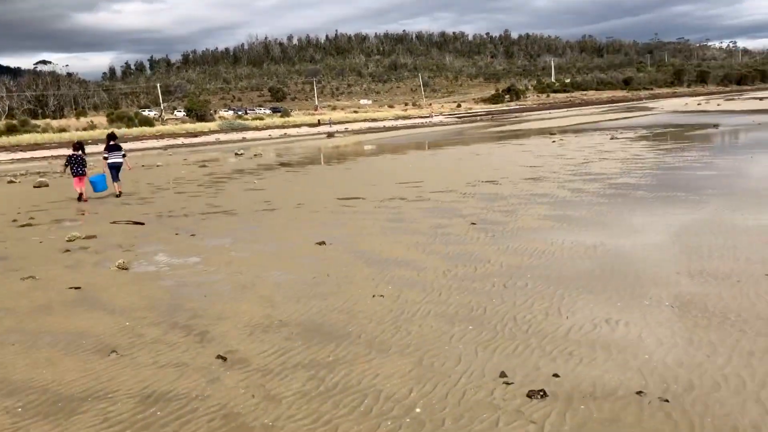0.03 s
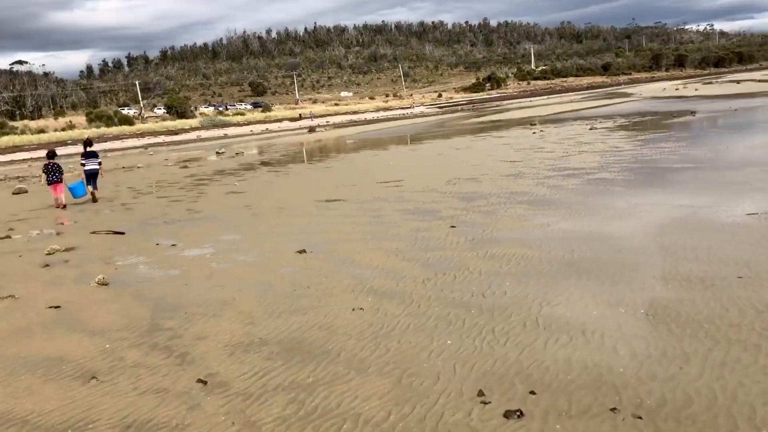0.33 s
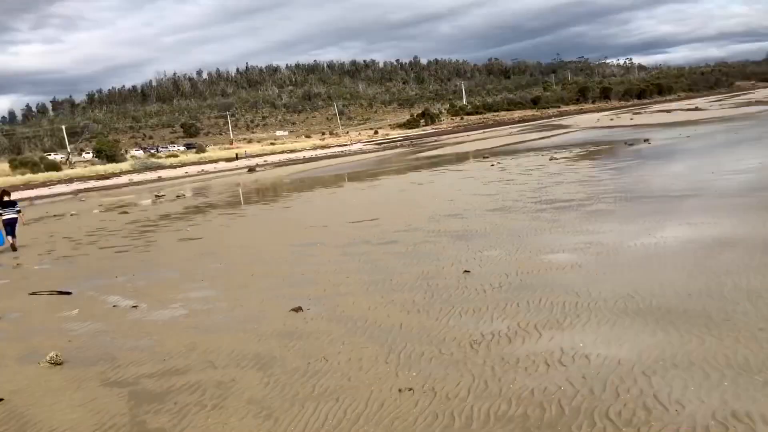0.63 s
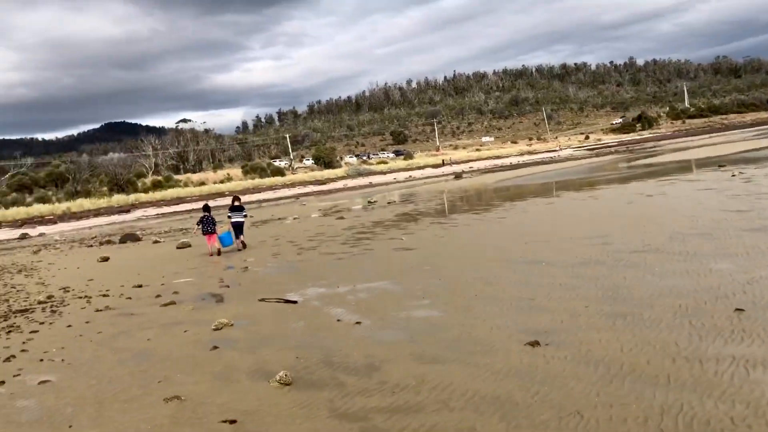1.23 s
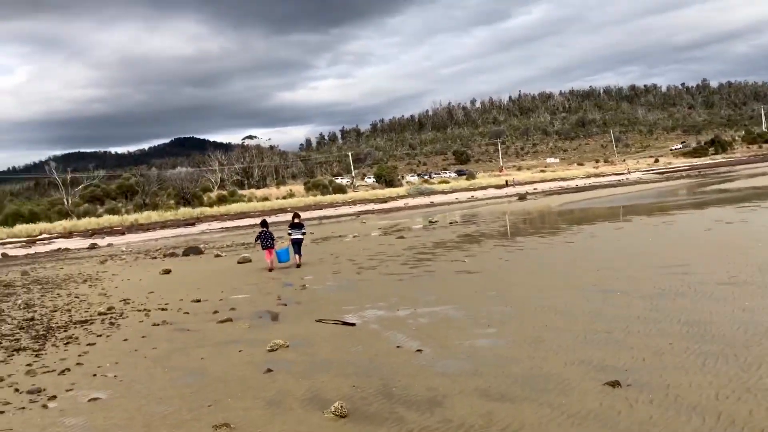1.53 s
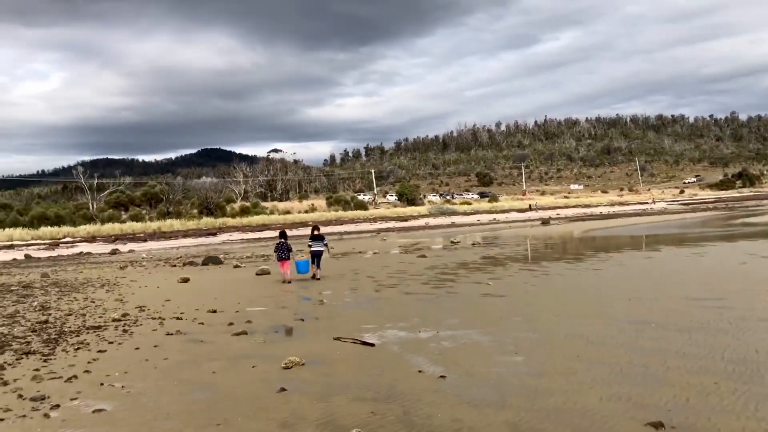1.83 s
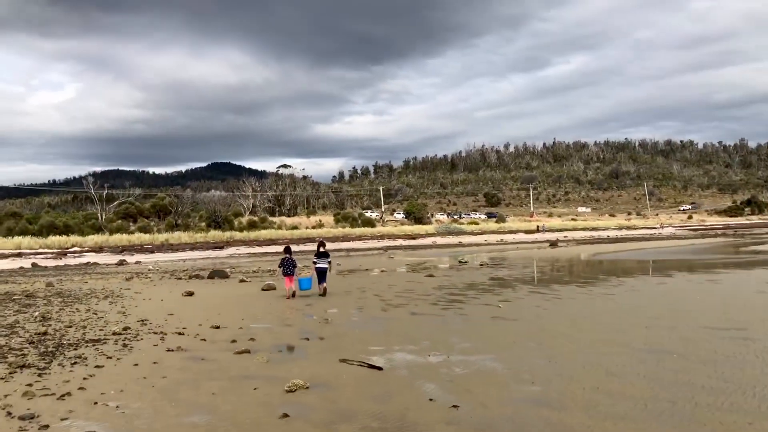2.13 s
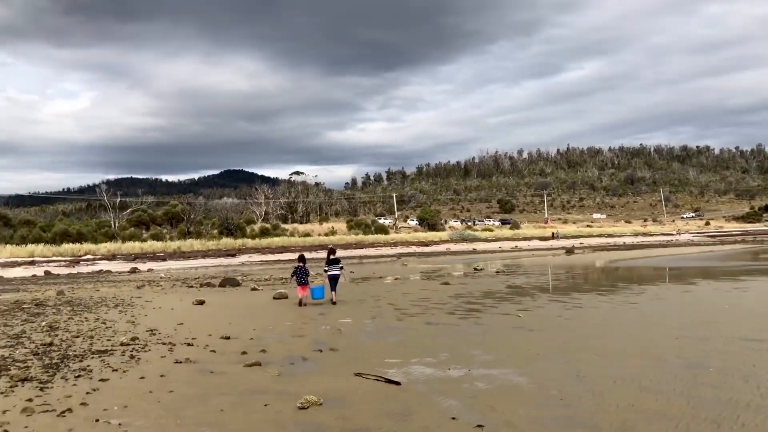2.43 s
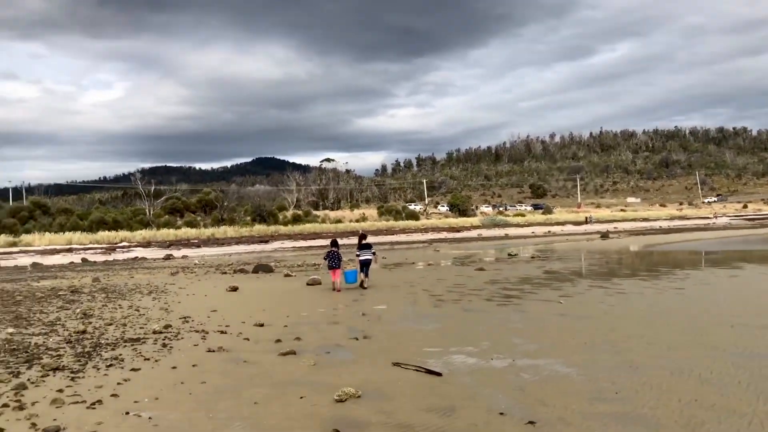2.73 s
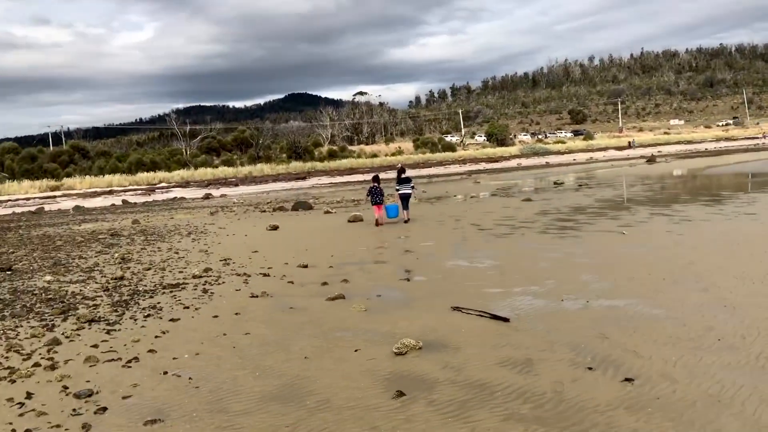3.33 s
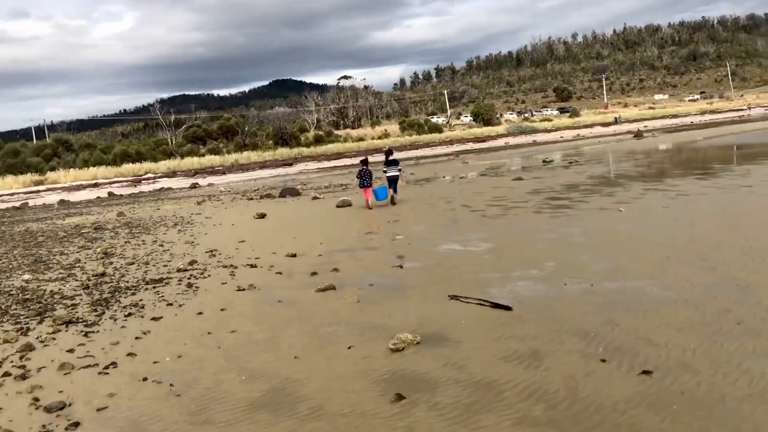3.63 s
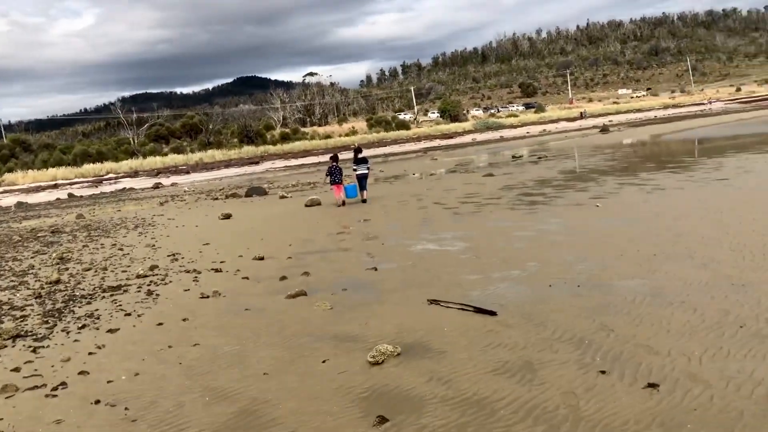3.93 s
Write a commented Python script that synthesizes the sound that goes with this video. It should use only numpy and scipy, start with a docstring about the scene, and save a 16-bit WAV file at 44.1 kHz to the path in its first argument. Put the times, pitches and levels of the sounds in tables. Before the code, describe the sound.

Footsteps squelch steadily across wet sand on an open tidal flat, with small pops and gritty scuffs. Wind thumps on the microphone, hardest at the start, then rumbles lightly over the faint wash of a distant shore.

```python
"""A wet tidal flat, where someone walks at just under two steps a second. Each step presses water out of the
sand in a fizzing squelch; air pockets pop, bits of shell grit crack underfoot, and sand grains scuff softly in
between. Wind buffets the microphone, hardest in the first second, over the far wash of the open shore. Late on
come a thin hiss and a faint hum."""
import sys
import numpy as np
from scipy import signal
from scipy.fft import rfft, irfft
from scipy.io import wavfile
from scipy.ndimage import uniform_filter1d

SR = 44100
rng = np.random.default_rng(int(sys.argv[2]) if len(sys.argv) > 2 else 0)


def unload_audio(sound):
    """Save the sound as a 16-bit wav file, at the path given as the first command line argument."""
    columns = np.transpose(np.atleast_2d(sound))
    # keep every value between -1 and 1, then stretch to whole-number steps
    steps = np.round(np.clip(columns, -1, 1) * 32767)
    wavfile.write(sys.argv[1], SR, steps.astype(np.int16))


N = 176400
TIME = np.arange(N) / SR
BIN_HZ = np.arange(N // 2 + 1) * SR / N


def from_db(db):
    """Decibels to gain."""
    return 10 ** (np.asarray(db) / 20)


def rms_one(x):
    """Scale to rms 1."""
    return x / np.sqrt(np.mean(x ** 2) + 1e-20)


def fader(points):
    """Gain ride through (time_s, level_db) points."""
    return from_db(np.interp(TIME, *np.transpose(points)))


def equalise(x, curve):
    """Filter by a smooth (freq_hz, gain_db) curve."""
    hz, db = np.transpose(curve)
    return irfft(rfft(x) * from_db(np.interp(np.log(BIN_HZ + 1), np.log(hz), db)), N)


def noise(curve):
    """Coloured noise, rms 1."""
    return rms_one(equalise(rng.standard_normal(N), curve))


def drift(rate_hz):
    """Random wander, mostly slower than rate_hz, rms 1."""
    return rms_one(irfft(rfft(rng.standard_normal(N)) / (1 + (BIN_HZ / rate_hz) ** 2), N))


def envelope(start_s, length_s, attack_s, release_s):
    """Linear attack, hold, and an exponential release that is down to 1/e after length_s."""
    rise = np.clip((TIME - start_s) / attack_s + .5, 0, 1)
    return rise * np.exp(-np.clip((TIME - start_s - length_s) / release_s + 1, 0, 20))


def breeze():
    """Light, steady wind: a low rumble with a slight flutter."""
    # strength of the breeze: time_s, level_db
    ride = [(0, -48.5), (.8, -43), (1.0, -53.5), (1.3, -48), (1.65, -43), (2.1, -49.5), (2.35, -48.5),
            (2.5, -47), (2.72, -47), (3.05, -46.5), (3.5, -48.5), (4, -44.5)]
    # tone of the rumble: freq_hz, gain_db
    tone = [(20, -22), (35, -21), (60, 3), (100, -0.5), (140, 1), (220, -4), (400, -14), (900, -52)]
    return fader(ride) * noise(tone) * from_db(1.5 * drift(rate_hz=7.8))


def buffets():
    """Eddies hit the microphone, each a short, dull thud; small fast ones carry less bass."""
    # eddies: start_s, length_s, level_db, upper_edge_hz
    eddies = [(.0, 0.061, -34.5, 141), (0.076, 0.1, -35.5, 223), (0.2477, 0.011, -18, 464),
              (0.258, 0.059, -24.5, 209), (0.304, 0.0049, -18.5, 680), (0.308, 0.031, -25.5, 462),
              (0.338, 0.029, -27, 191), (0.36, 0.096, -37, 260), (0.443, 0.014, -32, 604),
              (0.466, 0.15, -31.5, 194), (.483, 0.034, -36.5, 450), (0.495, .005, -27, 780),
              (0.536, 0.022, -28.5, 380), (0.582, 0.02, -23, 119), (0.648, 0.0047, -22.5, 476),
              (0.655, 0.023, -34, 557), (0.702, 0.032, -26.5, 214), (0.7256, 0.0087, -16.5, 735),
              (0.729, 0.018, -21, 187), (0.738, 0.011, -16.5, 716), (0.746, 0.019, -24.5, 350),
              (0.766, 0.039, -39, 172), (0.811, 0.014, -33.5, 360), (.84, 0.049, -38.5, 210),
              (1.154, 0.039, -38.5, 135), (1.371, 0.014, -24.5, 258), (1.396, 0.033, -28.5, 228),
              (1.536, 0.019, -30, 197), (1.702, 0.036, -42, 190), (1.792, 0.037, -34, 134),
              (1.888, 0.045, -41.5, 177), (2.243, 0.0064, -34, 650), (2.847, 0.012, -29.5, 191),
              (2.873, 0.027, -31, 186), (2.985, 0.03, -36.5, 165), (3.152, 0.067, -40, 148),
              (3.209, 0.04, -34, 347), (3.269, 0.066, -44.5, 166), (3.611, 0.051, -40.5, 198),
              (3.741, 0.086, -41.5, 235), (3.873, 0.038, -37, 239), (3.949, 0.011, -27, 268),
              (3.977, 0.036, -33.5, 132)]
    out = np.zeros(N)
    for start_s, length_s, level_db, edge_hz in eddies:
        first = max(int(start_s * SR) - SR // 5, 0)
        span = slice(first, first + SR // 2)
        shape = envelope(start_s, length_s, attack_s=0.0027, release_s=0.0054)[span]
        top_cut = signal.butter(4, edge_hz, fs=SR, output="sos")
        slope = signal.butter(1, 0.43 * edge_hz, fs=SR, output="sos")
        bass_cut = signal.butter(2, 23 + 0.15 * edge_hz, "high", fs=SR, output="sos")
        rumble = signal.sosfilt(np.vstack([top_cut, slope, bass_cut]), rng.standard_normal(SR))
        thud = rumble[-len(shape):] * uniform_filter1d(shape, size=90)
        out[span] += from_db(level_db) * thud * np.sqrt(np.sum(shape ** 2) / np.sum(thud ** 2))
    return out


def shore():
    """The smooth, far wash of the open shore."""
    # swell of the wash: time_s, level_db
    ride = [(0, -51.5), (.9, -51.5), (1.4, -50), (2.1, -50.5), (2.65, -52.5), (3.3, -51.5), (4, -50.5)]
    # tone of the wash: freq_hz, gain_db
    tone = [(30, -22), (150, -1.5), (340, 3.5), (450, 2), (650, 2), (1000, -2), (1500, -7.5), (2500, -17.5),
            (4000, -27.5), (8000, -58), (12000, -28.5), (16000, -68)]
    return fader(ride) * noise(tone)


def grit():
    """Sand grains scuff between the squelches: a soft hiss with a fast crunch."""
    # strength of the scuffing: time_s, level_db
    ride = [(0, -70), (.2, -63), (.42, -68.5), (.62, -64.5), (.76, -64.5), (.95, -68.5), (1.07, -57.5),
            (1.17, -61), (1.42, -65.5), (1.53, -61), (1.68, -68.5), (1.9, -61.5), (2.02, -62.5),
            (2.16, -66), (2.42, -61.5), (2.68, -67), (2.92, -60.5), (3.14, -64), (3.54, -61.5),
            (3.78, -66.5), (4, -60)]
    # tone of the sand: freq_hz, gain_db
    tone = [(800, -13), (1800, 10), (3500, 8.5), (7000, 1.5), (11000, -4.5), (16000, 2.5)]
    crunch = from_db(2.5 * drift(rate_hz=260))
    return fader(ride) * rms_one(equalise(rng.standard_normal(N) * crunch, tone))


def pops():
    """Each air pocket bursts, rings briefly with a rising pitch and throws a puff of spray."""
    # bursting air pockets: start_s, level_db, pitch_hz
    pockets = [(.137, -54, 6450), (0.302, -49.5, 4850), (.352, -55.5, 6000), (.658, -43.5, 8300),
               (0.6628, -41.5, 6300), (.689, -42.5, 6750), (0.695, -38, 2550), (0.787, -54.5, 4500),
               (0.826, -54, 2050), (1.027, -57, 5100), (1.215, -54, 4200), (1.224, -40, 3140),
               (1.276, -42.5, 1700), (1.289, -54, 6150), (1.266, -55, 2470), (1.317, -45.5, 4000),
               (1.528, -50, 6240), (1.575, -53.5, 4530), (1.8504, -41, 5200), (1.856, -41.5, 9000),
               (1.917, -54, 12500), (2.02, -51, 3470), (2.2982, -43, 8700), (2.3015, -38.5, 15000),
               (2.3125, -49.5, 3750), (2.317, -39.5, 3550), (2.338, -41, 10000), (2.342, -45, 3900),
               (2.364, -46.5, 3280), (2.406, -47.5, 2900), (2.8502, -37.5, 8250), (2.899, -60, 6860),
               (2.969, -55, 3680), (2.999, -44, 1940), (3.285, -49.5, 3200), (3.4, -48.5, 1770),
               (3.405, -36.5, 1304), (3.412, -45, 1370), (3.4095, -51, 4100), (3.4254, -40.5, 2960),
               (3.436, -35, 10800), (3.462, -44, 1820), (3.4645, -41, 6150), (3.495, -54, 4230),
               (3.559, -47.5, 2300), (3.581, -49.5, 3600), (3.711, -58.5, 4800), (3.799, -51, 2130),
               (3.8637, -44, 10500), (3.9029, -41, 7100), (3.972, -56, 2160)]
    ring_cycles, ring_db, glide_share = 5.4, 3.5, 0.013
    spray_decay_s, spray_band_ratio = 0.0013, 1.37
    out, t = np.zeros(N + SR), np.arange(SR // 20) / SR
    for start_s, level_db, pitch_hz in pockets:
        decay = np.exp(-t * pitch_hz / ring_cycles)
        rising_hz = pitch_hz * (1 + glide_share * (1 - decay))
        ring = np.sin(2 * np.pi * np.cumsum(rising_hz) / SR) * decay
        edges_hz = [pitch_hz / spray_band_ratio, min(pitch_hz * spray_band_ratio, SR * .45)]
        band = signal.butter(2, edges_hz, "band", fs=SR, output="sos")
        spray = signal.sosfilt(band, rng.standard_normal(len(t))) * np.exp(-t / spray_decay_s)
        spray *= np.sqrt(spray_decay_s * SR / np.sum(spray ** 2))
        first = int(start_s * SR)
        out[first:first + len(t)] += from_db(level_db) * (from_db(ring_db) * ring + spray)
    return out[:N]


def grains(low_hz, high_hz, ring_cycles, tilt_db_per_octave):
    """Tiny random bursts, each dying by 60 dB over ring_cycles; every pitch clumps on its own."""
    grains_per_s, pitch_count, spread_db, clump_db = 4500, 12, 4, 5
    levelling_s = 0.014   # loudness is evened over this time, so no single grain sticks out
    onsets = np.flatnonzero(rng.random(N) < grains_per_s / SR)
    sizes = from_db(spread_db * np.minimum(rng.exponential(1, N), 4)) * rng.choice([-1, 1], N)
    pitch_index = rng.integers(0, pitch_count, N)
    out = np.zeros(N)
    for k, hz in enumerate(np.geomspace(low_hz, high_hz, pitch_count)):
        hits = onsets[pitch_index[onsets] == k]
        clicks = np.full(N, 1e-18)
        clicks[hits] = sizes[hits]
        clumps = from_db(clump_db * drift(rate_hz=390))
        radius, angle = from_db(-60 * hz / (ring_cycles * SR)), 2 * np.pi * hz / SR
        rings = signal.lfilter([1, 0, -1], [1, -2 * radius * np.cos(angle), radius ** 2], clicks * clumps)
        out += from_db(tilt_db_per_octave * np.log2(hz / low_hz)) * rms_one(rings)
    return out / np.sqrt(uniform_filter1d(out ** 2, size=int(levelling_s * SR) + 1) + 1e-9)


def squelches():
    """Water forced through sand: bright fizz over a lower gurgle, with a short draining tail."""
    # a sole presses or leaves the sand: start_s, length_s, level_db, gurgle_trim_db
    presses = [(0.192, 0.073, -59, -9), (0.301, 0.0082, -50.5, -3.5), (0.658, 0.015, -47.5, -6.5),
               (0.67, 0.048, -52.5, -13), (1.128, 0.0096, -57, 1.5), (1.203, 0.028, -46, -8),
               (1.255, 0.026, -53.5, -1.5), (1.277, 0.047, -49.5, -10), (1.762, 0.023, -52.5, -3.5),
               (1.796, 0.041, -57.5, -3.5), (1.844, 0.012, -52.5, -0.5), (2.002, 0.041, -73, 8),
               (2.305, 0.054, -50, -6), (2.362, 0.039, -58.5, -5.5), (2.847, 0.008, -47.5, -4),
               (2.893, 0.033, -67, 6.5), (3.398, 0.018, -44.5, -11.5), (3.422, 0.03, -49, -8),
               (3.461, 0.023, -50.5, -5.5), (3.518, 0.03, -73, 1), (3.847, 0.044, -56.5, -12),
               (3.933, 0.06, -61.5, 0.5)]
    fizz_db, gurgle_db, drain_db = -10, 2, 1
    fizz_power, gurgle_power = np.zeros(N), np.zeros(N)
    for start_s, length_s, level_db, gurgle_trim_db in presses:
        press = envelope(start_s, length_s, attack_s=0.004, release_s=0.0064)
        drain = from_db(drain_db) * envelope(start_s, length_s, attack_s=0.004, release_s=0.032)
        power = (press ** 2 + drain ** 2) * from_db(level_db) ** 2
        fizz_power += power
        gurgle_power += power * from_db(gurgle_trim_db) ** 2
    fizz = np.sqrt(fizz_power) * grains(3550, 15000, ring_cycles=9.6, tilt_db_per_octave=5.5)
    gurgle = np.sqrt(gurgle_power) * grains(1120, 4000, ring_cycles=3.6, tilt_db_per_octave=-5)
    return from_db(fizz_db) * fizz + from_db(gurgle_db) * gurgle


def scatter(x):
    """Add a few milliseconds of diffuse reflections off the ground and the walker's legs."""
    decay_s, send_db = 0.0036, -9
    t = np.arange(SR // 10) / SR
    decay = np.exp(-t / decay_s)
    tail = rng.standard_normal(len(t)) * decay * (1 - decay)
    return x + from_db(send_db) * signal.fftconvolve(x, tail / np.sqrt(np.sum(tail ** 2)))[:N]


def snaps():
    """Bits of shell grit crack underfoot, each a sharp, full-band snap."""
    # cracking shell grit: start_s, level_db
    cracks = [(0.656, -40), (0.6805, -43), (0.7062, -42), (1.126, -43), (1.3017, -38), (1.527, -44),
              (1.7425, -51), (1.8497, -45), (1.855, -41), (2.8505, -30), (3.4238, -42), (3.464, -43),
              (3.8631, -44), (3.9018, -38.5)]
    # tone of the crack: freq_hz, gain_db
    tone = [(500, -14), (1500, 3), (3500, 4.5), (9000, -5.5), (16000, -2)]
    bursts = sum(from_db(level_db) * envelope(start_s, 0, attack_s=0.00015, release_s=0.0019)
                 for start_s, level_db in cracks)
    return np.e * bursts * noise(tone)   # e makes up for envelopes that start 1/e down


def high_hiss():
    """A moment of faint, thin hiss: a narrow band of noise, very high up."""
    # swells of hiss: start_s, length_s, level_db
    swells = [(2.814, 0.065, -67), (3.005, 0.055, -67), (3.06, 0.14, -79)]
    centre_hz, half_width_hz = 12600, 335
    edges_hz = [centre_hz - half_width_hz, centre_hz + half_width_hz]
    band = signal.butter(2, edges_hz, "band", fs=SR, output="sos")
    hiss = rms_one(signal.sosfilt(band, rng.standard_normal(N)))
    return hiss * sum(from_db(level_db) * envelope(start_s, length_s, attack_s=0.03, release_s=0.025)
                      for start_s, length_s, level_db in swells)


def hum():
    """One distant tone that sinks slowly, fading in and out on the wind."""
    # path of the tone: time_s, pitch_hz, level_db
    path = [(0, 355.7, -92), (2.8, 355, -62), (3.1, 351.2, -58), (3.42, 344, -63), (3.74, 343.8, -52),
            (3.9, 337, -65), (4, 343, -61)]
    time_s, pitch_hz, level_db = np.transpose(path)
    tone = np.sqrt(2) * np.sin(2 * np.pi * np.cumsum(np.interp(TIME, time_s, pitch_hz)) / SR)
    return tone * from_db(np.interp(TIME, time_s, level_db) - 2 * drift(rate_hz=12))


def scene():
    """Footsteps and wind over the distant bed, in mono."""
    steps = scatter(squelches() + pops() + snaps()) + grit()
    wind = breeze() + buffets()
    bed = high_hiss() + shore() + hum()
    return (steps + wind + bed)[None]


def record(dry):
    """The microphone colours the sound, the level dips briefly, and the top is cut off steeply."""
    # microphone response: freq_hz, gain_db
    response = [(22, -40), (45, -0.5), (300, -3), (6000, -5), (7500, -5.5), (9800, -4), (11800, -10.5),
                (13400, -12), (15000, -7.5), (16000, -15)]
    dip_at_s, dip_width_s, dip_db = 0.573, 0.013, -22.5
    cutoff_hz = 16000
    dip = from_db(dip_db * np.exp(-np.abs(TIME - dip_at_s) / dip_width_s))
    top_cut = signal.ellip(12, .1, 80, cutoff_hz, fs=SR, output="sos")
    return signal.sosfilt(top_cut, equalise(dry, response) * dip)


dry = scene()
out = record(dry)
unload_audio(out)
```